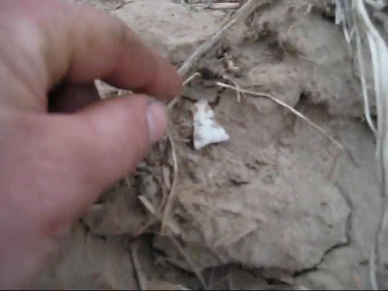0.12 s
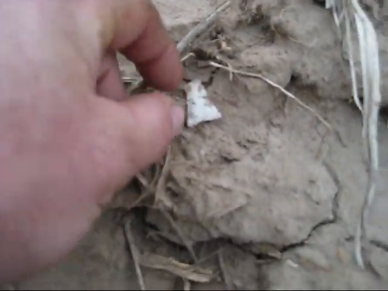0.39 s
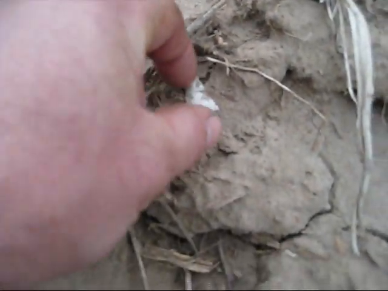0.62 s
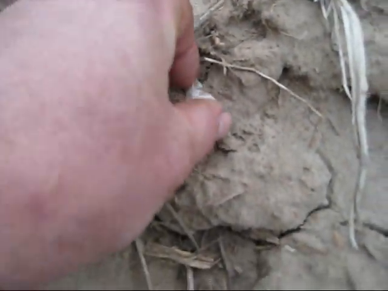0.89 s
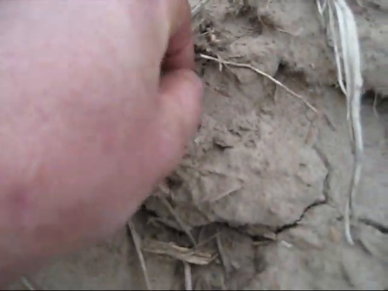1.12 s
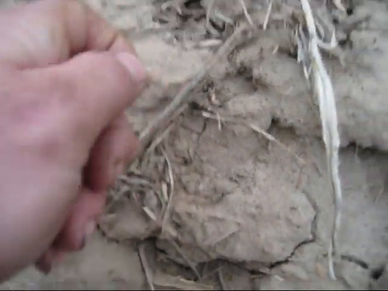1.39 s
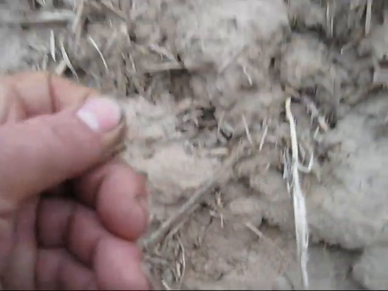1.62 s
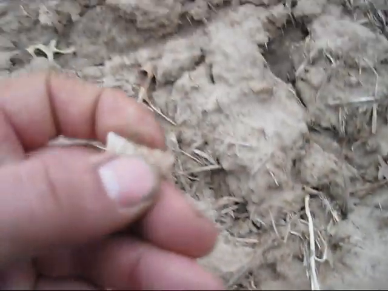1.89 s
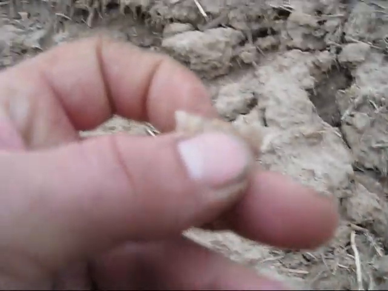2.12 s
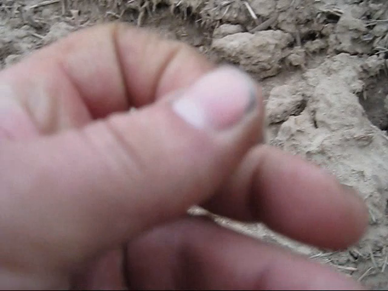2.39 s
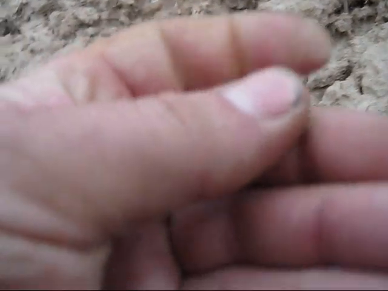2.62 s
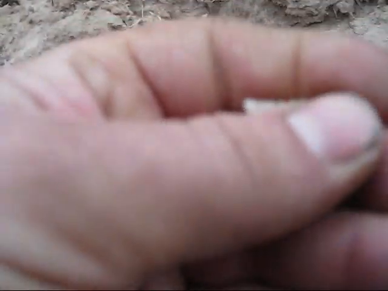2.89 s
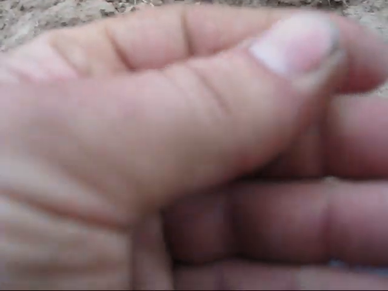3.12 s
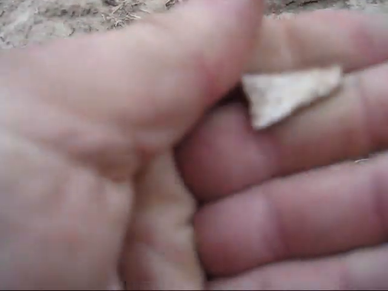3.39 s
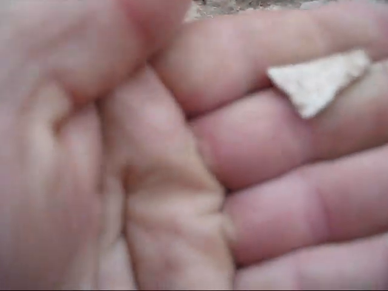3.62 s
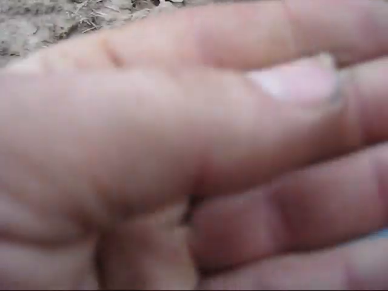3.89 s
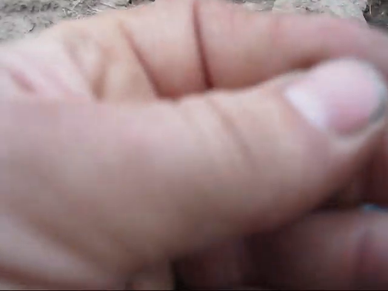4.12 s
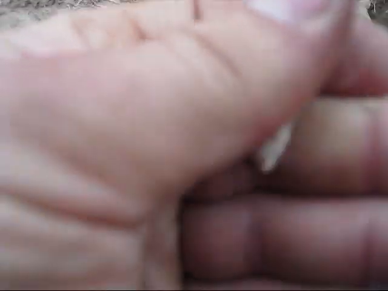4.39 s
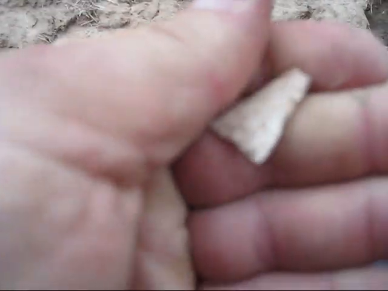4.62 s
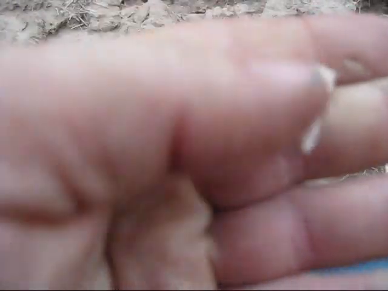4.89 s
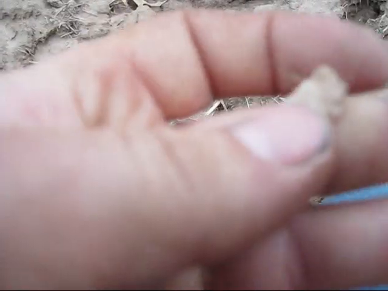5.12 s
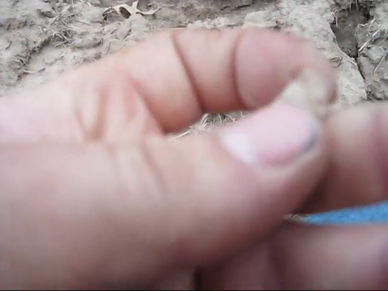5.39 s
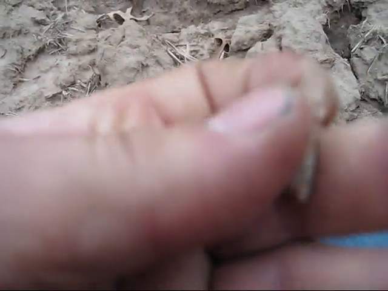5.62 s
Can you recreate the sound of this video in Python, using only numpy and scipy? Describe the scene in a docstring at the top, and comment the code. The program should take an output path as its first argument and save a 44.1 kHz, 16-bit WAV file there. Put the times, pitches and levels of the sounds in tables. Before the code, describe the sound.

Wind thumps a close microphone, then fingers rub a small gritty stone with dry, hissing scrapes and scattered sharp clicks in an open field.

```python
"""Wind buffets the microphone at first, in lumpy rumble and single thumps, while a sleeve rustles softly.
A hand picks a small stone from dry soil in an open field and rubs off the grit: the thumb hisses and scrapes
in overlapping strokes of shaped noise. Dry crumbs crackle in sparse short rings; grit and stubble tick in
broad ringing modes. Faint noise lies beneath. Both channels are alike, with a narrow dead band in the treble."""
import sys
import numpy as np
from scipy import signal
from scipy.fft import rfft, irfft, next_fast_len
from scipy.io import wavfile
from scipy.ndimage import uniform_filter1d

SR = 44100
rng = np.random.default_rng(int(sys.argv[2]) if len(sys.argv) > 2 else 0)


def attenuation_scalar(level_db):
    """Turn a level in dB into a linear amplitude multiplier (20 dB per decade)."""
    decades = np.asarray(level_db, float) / 20
    return 10 ** decades


def generate_wav(signal):
    """Clip the signal to [-1, 1] and save it as 16-bit WAV at the path in sys.argv[1]."""
    frames = np.transpose(np.atleast_2d(signal))
    scaled = np.clip(frames, -1, 1) * 32767
    pcm = np.round(scaled).astype(np.int16)
    wavfile.write(sys.argv[1], SR, pcm)


N = 254016

# Brushing of the sleeve and stubble as the arm moves.
# Each row: time in seconds, level in dB, centre of the colour in Hz.
ARM_RUSTLE = [(0.0, -49.5, 710), (0.42, -54, 660), (0.62, -53, 832), (0.87, -53, 675), (1.06, -56, 1050),
              (1.39, -46.5, 1580), (1.59, -41, 1590), (2.1, -42.5, 950), (2.41, -40, 1160),
              (2.57, -40, 1120), (3.0, -47.5, 1080), (3.3, -45.5, 1550), (3.77, -50.5, 1040),
              (4.49, -47, 1470), (4.72, -46.5, 1110), (5.28, -52.5, 970), (5.76, -49, 1160)]


def evened(x):
    """Scales to rms 1."""
    return x / np.sqrt(np.mean(x ** 2) + 1e-20)


def read(points, hz):
    """A spectrum's dB at the given frequencies, drawn straight over log frequency."""
    f, db = np.transpose(points)
    return np.interp(np.log(hz + 1), np.log(f + 1), db)


def curve(rows, column, t=np.arange(N) / SR):
    """One column of a table, drawn straight between its rows, at times t in seconds."""
    rows = np.array(rows)
    return np.interp(t, rows[:, 0], rows[:, column])


def coloured(x, points):
    """Filters x by a spectrum of (Hz, dB) points."""
    size = next_fast_len(N + 4096)
    gain = attenuation_scalar(read(points, np.fft.rfftfreq(size, 1 / SR)))
    return irfft(rfft(x, size) * gain, size)[:N]


def wobble(size):
    """Slow chance of rms 1 that holds for about size samples."""
    smooth = uniform_filter1d(rng.standard_normal(N), size)
    return evened(uniform_filter1d(smooth, size))


def grit(spread_db, flutter_db):
    """Very many tiny slips of unequal size that come in clumps of a few milliseconds."""
    spread = spread_db * np.minimum(rng.exponential(1, N), 5)
    clumps = flutter_db * wobble(size=150)
    return attenuation_scalar(spread + clumps) * rng.standard_normal(N)


def patchy(x, rows, patchy_db, bump_db, peak_column, breadth):
    """Drifting loud and soft patches over time and pitch, and a broad peak that moves along one column of rows."""
    hz, t, z = signal.stft(x, SR, nperseg=256, noverlap=192)
    field = rng.standard_normal(z.shape)
    field = uniform_filter1d(field, size=5, axis=0)
    field = evened(uniform_filter1d(field, size=24, axis=1))
    distance = np.log((hz[:, None] + 1) / curve(rows, peak_column, t))
    bump = np.exp(-(distance / breadth) ** 2)
    z = z * attenuation_scalar(patchy_db * field + bump_db * bump)
    # level out the slow loudness, so that the source's own levels rule
    power = np.mean(abs(z) ** 2, axis=0)
    z = z * np.sqrt(np.mean(power) / uniform_filter1d(power, size=60))
    return evened(signal.istft(z, SR, nperseg=256, noverlap=192)[1][:N])


def swells(rows, column, sharpness, under_db):
    """Level in dB of overlapping arches (start, length) whose powers add to an undertow."""
    power = attenuation_scalar(2 * under_db)
    for row in rows:
        start, length = row[:2]
        phase = np.pi * np.arange(round(length * SR)) / (length * SR)
        arch = np.sin(phase) ** sharpness
        part = power[round(start * SR):][:len(arch)]
        part += (attenuation_scalar(row[column]) * arch[:len(part)]) ** 2
    return 10 * np.log10(power)


def thumb():
    """Skin ridges drag fine dust (hiss) and coarser grains (scrape) in the same slips."""
    # Thumb strokes over the stone. Each row: start in seconds, length in seconds, fine hiss in dB,
    # coarse scrape in dB, centre of the scrape in Hz.
    strokes = [(0.165, 0.071, -44.4, -73, 4370), (0.632, 0.16, -49, -49.4, 2830),
               (0.717, 0.18, -58, -49, 3860), (1.08, 0.131, -50, -50, 4540),
               (1.168, 0.18, -45, -42.5, 3480), (1.246, 0.31, -43, -45, 3630),
               (1.446, 0.14, -33.5, -38, 3550), (1.51, 0.16, -58, -39, 2950), (1.677, 0.15, -33, -46, 3900),
               (1.76, 0.23, -35, -59, 3850), (1.889, 0.34, -46, -45.5, 4200), (2.327, 0.17, -41, -44, 3750),
               (2.423, 0.05, -31, -38, 4330), (2.593, 0.1, -29.5, -35.5, 3440),
               (2.676, 0.25, -35.5, -43.5, 4500), (2.759, 0.091, -25, -38.5, 4300),
               (2.877, 0.32, -35, -42.5, 5470), (2.967, 0.07, -31.0, -38, 5240),
               (3.056, 0.22, -27.5, -49, 5900), (3.124, 0.24, -27, -36, 5700),
               (3.255, 0.21, -40.5, -36.5, 4240), (3.389, 0.217, -40, -42, 3950),
               (3.509, 0.209, -32, -45.5, 3530), (3.658, 0.14, -41, -51.5, 3130),
               (3.783, 0.12, -35, -50.5, 3640), (3.85, 0.21, -73, -45.5, 3200),
               (3.987, 0.42, -34, -43, 5070), (4.103, 0.13, -32.8, -44, 4900),
               (4.272, 0.21, -33.5, -39.5, 5040), (4.386, 0.18, -26.1, -36, 4340),
               (4.477, 0.18, -36, -39, 4590), (4.592, 0.12, -36, -46, 3830),
               (4.652, 0.29, -39.0, -45.5, 4040), (4.825, 0.12, -35, -46, 3900),
               (5.183, 0.074, -45, -64, 3860), (5.231, 0.09, -34.5, -56, 4200),
               (5.24, 0.187, -41.5, -65, 4530), (5.415, 0.12, -37, -46.5, 3000),
               (5.572, 0.15, -46.5, -50, 3500), (5.643, 0.1, -34.5, -39, 3900),
               (5.677, 0.13, -33.0, -43, 3700)]
    # Colour of the fine dust. Each row: frequency in Hz, gain in dB.
    hiss_colour = [(5000, -26), (7000, -10.5), (8500, -4.5), (11000, -7), (14000, -7), (16000, 2)]
    # Colour of the coarse grains. Each row: frequency in Hz, gain in dB.
    scrape_colour = [(900, -9.5), (1900, 0.5), (3000, 0), (3500, -1.5), (4000, -5), (4550, -2.8),
                     (5100, -4), (6300, -3), (7500, -7), (10000, -9)]
    sharpness = 2.01  # a stroke swells and fades as this power of one arch
    drag_hiss_db, drag_scrape_db = -10.5, -3.  # a light drag follows the rustle, this far from its level
    colour_sum_hz = 15930  # the hiss peak sinks as the scrape peak rises

    slips = grit(spread_db=.8, flutter_db=1.0)
    centres = sorted((s + length / 2, hz, colour_sum_hz - hz) for s, length, *_, hz in strokes)
    hiss = patchy(coloured(slips, hiss_colour), centres,
                  patchy_db=3.0, bump_db=8.5, peak_column=2, breadth=0.3)
    scrape = patchy(coloured(slips, scrape_colour), centres,
                    patchy_db=1.2, bump_db=8., peak_column=1, breadth=.27)
    arm_db = curve(ARM_RUSTLE, 1)
    hiss_db = swells(strokes, 2, sharpness, arm_db + drag_hiss_db)
    scrape_db = swells(strokes, 3, sharpness, arm_db + drag_scrape_db)
    return attenuation_scalar(hiss_db) * hiss + attenuation_scalar(scrape_db) * scrape


def sleeve():
    """Soft fibres brush past in duller grains, under a very broad peak that drifts in pitch."""
    # Colour of the cloth. Each row: frequency in Hz, gain in dB.
    cloth = [(50, -23), (150, -10.5), (350, -6.5), (600, -3.5), (1000, -3), (1600, -5.5), (2400, -8.5),
             (4000, -15), (7000, -65)]
    grains = grit(spread_db=1.5, flutter_db=1.2)
    fibres = patchy(grains, ARM_RUSTLE, patchy_db=1.67, bump_db=3.5, peak_column=2, breadth=0.92)
    return attenuation_scalar(curve(ARM_RUSTLE, 1)) * evened(coloured(fibres, cloth))


def crackle():
    """Dry crumbs break in sparse snaps of unequal size and either sign, each a cycle or two long."""
    # Crumbs breaking under the fingers.
    # Each row: start in seconds, length in seconds, typical snap level in dB.
    crumbles = [(.9, 0.22, -43), (1.4, .25, -27), (2.0, 0.83, -46), (4.9, 0.24, -35)]
    snaps_per_s, snap_hz, snap_s = 110, 1650, .0004  # mean rate, pitch, time to the top of the envelope
    snaps = (rng.random(N) < snaps_per_s / SR) * rng.uniform(-1.34, 1.4, N)
    t = np.arange(120) / SR
    ring = t / snap_s * np.exp(1 - t / snap_s) * np.sin(2 * np.pi * snap_hz * t)
    level_db = swells(crumbles, 2, 0.66, np.full(N, -60.))  # faint snaps go on between the bursts
    return np.convolve(snaps * attenuation_scalar(level_db), ring)[:N]


def ticks():
    """Grit or stubble gives a snap, or a short crunch of many, that rings one broad mode for a moment."""
    # Grit and stubble ticks. Each row: time in seconds, peak level in dB, pitch of the mode in Hz,
    # width of the mode in Hz, length of the crunch in ms (a quarter or less: one snap).
    tick_rows = [(0.138, -26, 13800, 6000, 1.1), (.4049, -37, 12000, 5000, .8),
                 (0.792, -37, 12000, 5000, .8), (1.1178, -34, 10000, 3000, 1.5),
                 (1.1287, -30, 10800, 5000, 2.2), (1.1725, -36, 13500, 3000, 1.5),
                 (1.217, -21, 14000, 8000, .8), (1.2207, -21.5, 14000, 9000, 1.7),
                 (1.2275, -26, 14600, 5000, .8), (1.241, -32, 12000, 7000, 1.),
                 (1.2496, -22.5, 3870, 5040, 0.91), (1.25, -25, 11500, 6000, 1.),
                 (1.3194, -25.5, 9300, 2500, 1.8), (1.32, -31, 3060, 900, .1),
                 (1.385, -27, 9700, 3000, 1.5), (1.4195, -33, 11000, 4000, 1.2),
                 (1.48, -24, 3050, 2500, 3.), (1.596, -24, 2490, 2500, 1.5), (2.058, -23, 10400, 6000, 7.1),
                 (2.055, -28, 890, 706, 2.4), (2.097, -26, 1240, 500, .1), (2.3232, -34, 13000, 6000, 1.2),
                 (2.5327, -17, 1220, 450, .1), (2.595, -24, 11100, 8100, 13), (2.6126, -17.5, 770, 700, .1),
                 (3.1045, -13, 13000, 5000, .4), (3.307, -10.5, 3360, 3100, .1),
                 (3.5105, -27, 2480, 2950, 3), (5.7422, -28, 12000, 5000, .4)]
    out, t = np.zeros(N + 1600), np.arange(800) / SR  # 400 samples of room ahead
    for s, db, hz, width, ms in tick_rows:
        u = np.pi * width * t
        ring = u * np.exp(1 - u) * np.sin(2 * np.pi * hz * t)
        cracks = rng.standard_normal(800)
        if ms > .25:
            decay_ms = np.where(t < t[400], 0.25 * ms, 0.89 * ms)  # quick rise, slower fall
            crunch = cracks * np.exp(-abs(t - t[400]) * 1000 / decay_ms)
        else:
            crunch = 1. * (t == t[400])
        snap = signal.oaconvolve(crunch, ring)
        start = round(s * SR - SR / (np.pi * width))  # the ring's envelope tops out at s
        out[start:][:1599] += attenuation_scalar(db) * snap / abs(snap).max()
    return out[400:N + 400]


def rumble(level_db):
    """Wind churns into lumpy low noise, whose spectrum reaches higher when the wind is strong."""
    # Strong wind. Each row: frequency in Hz, gain in dB.
    eddies = [(20, -26), (40, -13), (80, 1), (150, 2.5), (260, -4.5), (400, -11.5), (600, -55), (900, -70)]
    # Weak wind, deeper in pitch. Each row: frequency in Hz, gain in dB.
    lull = [(20, 2.5), (40, -6), (90, 2), (160, -11.5), (260, -21.5), (400, -44), (600, -63)]
    churn = rng.standard_normal(N)
    strong = np.clip((level_db + 47.5) / 12.0, 0, 1)
    blend = strong * evened(coloured(churn, eddies)) + (1 - strong) * evened(coloured(churn, lull))
    lumps = attenuation_scalar(3.8 * wobble(size=400))
    return attenuation_scalar(level_db) * evened(lumps * blend)


def buffets():
    """Single eddies thump the membrane: a few lopsided swings that rise fast and ring out."""
    # Thumps. Each row: time in seconds, peak level in dB, pitch in Hz, push (1) or pull (-1).
    thumps = [(.04, -16.5, 196, 1), (0.0728, -19.5, 263, 1), (0.082, -17.5, 188, -1), (0.1194, -18, 230, 1),
              (0.1253, -11.5, 350, 1), (.1998, -12, 240, 1), (0.2459, -15, 327, 1), (0.2657, -11.5, 227, 1),
              (0.2707, -4, 360, 1), (0.3379, -14, 260, 1), (0.3416, -11, 254, 1), (.351, -10, 282, 1),
              (0.3633, -13, 178, -1), (.4073, -19, 286, 1), (0.414, -23.5, 180, -1), (0.4716, -23, 189, 1),
              (0.568, -12, 226, 1), (0.5901, -19.5, 184, -1), (0.608, -17.5, 231, -1),
              (.7364, -20.5, 150, 1), (.82, -16.5, 300, 1), (.841, -15.5, 236, 1), (0.8519, -22, 260, -1),
              (.981, -23.5, 190, 1), (1.0213, -23, 170, -1), (1.0361, -18.5, 228, -1),
              (1.155, -20.5, 236, 1), (1.1836, -22.5, 220, 1), (1.291, -32, 131, -1),
              (1.337, -30.5, 130, 1), (2.312, -29, 126, -1), (2.6068, -29.5, 109, -1),
              (2.6529, -27.5, 199, 1), (2.8675, -28.5, 149, -1), (3.1, -32.5, 95, 1),
              (3.2926, -28.5, 109, 1), (3.5243, -35, 140, 1), (3.738, -36, 113, 1), (3.969, -40, 109, -1)]
    cycles_before, cycles_after = 0.37, 0.8  # cycles over which a thump swells, then rings out
    out, near = np.zeros(N), np.arange(-1500, 1500)
    for s, db, hz, way in thumps:
        turns = hz * near / SR
        window = np.exp(-(turns / np.where(near < 0, cycles_before, cycles_after)) ** 2)
        push = np.cos(2 * np.pi * turns - .3) * window
        push = np.expm1((0.61 + 0.99 * attenuation_scalar(db)) * push)  # a hard push has a sharper crest than trough
        push -= window * push.sum() / window.sum()  # the membrane springs back: no lasting offset
        out[round(s * SR) + near] += np.sign(way) * attenuation_scalar(db) * push / push.max()
    return out


def wind():
    """Gusts swell above a drifting wind as rumble, and single eddies stand out of it."""
    # Wind between gusts. Each row: time in seconds, rumble level in dB.
    breeze = [(0, -38), (.35, -41), (.9, -35.5), (1.25, -41), (1.4, -45.5), (1.75, -65), (2.3, -58),
              (2.7, -52), (3.5, -60), (4.1, -62), (5.76, -59)]
    # Gusts. Each row: start in seconds, length in seconds, rumble level in dB.
    gusts = [(0, 0.21, -32.5), (.24, 0.057, -25), (.42, 0.12, -39), (.54, 0.087, -31), (.69, 0.092, -31),
             (.96, 0.15, -37), (1.12, 0.21, -38.5), (1.38, 0.12, -43), (1.54, 0.2, -44), (2.27, .09, -48),
             (2.4, 0.05, -47), (2.55, 0.2, -40.5), (2.88, 0.136, -45), (3.04, 0.096, -42.5),
             (3.18, .17, -40.5), (3.37, 0.2, -43.5), (3.48, .16, -44), (3.69, 0.11, -49), (3.9, 0.12, -45)]
    level_db = swells(gusts, 2, 0.71, curve(breeze, 1))
    return rumble(level_db) + buffets()


def air():
    """Steady background noise, strongest in the low mids and falling towards the treble."""
    # Colour of the background. Each row: frequency in Hz, gain in dB.
    air_colour = [(25, -28), (60, -20), (150, -5.5), (389, -6), (874, -6.5), (6200, -18), (9200, -20.5),
                  (15500, -21)]
    return attenuation_scalar(-49) * evened(coloured(rng.standard_normal(N), air_colour))


def scene():
    """All sources at one microphone, alike in both channels."""
    mix = thumb() + sleeve() + crackle() + ticks() + wind() + air()
    return np.tile(mix, (2, 1))


def top_cut(x):
    """Nothing passes above the cut-off."""
    return signal.sosfilt(signal.butter(12, 17050, fs=SR, output="sos"), x)


def record(dry):
    """The microphone chain cuts a narrow dead band and limits the treble."""
    # Response of the chain. Each row: frequency in Hz, gain in dB.
    chain = [(6800, 0), (7400, -4), (7730, -10), (7800, -40), (7880, -30), (8030, -12), (8350, -4),
             (9000, 0), (15680, 0), (15800, -45), (15860, -75)]
    mix = np.array([coloured(channel, chain) for channel in dry])
    return top_cut(mix)


dry = scene()
out = record(dry)
generate_wav(out)
```